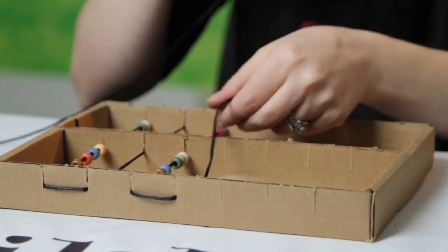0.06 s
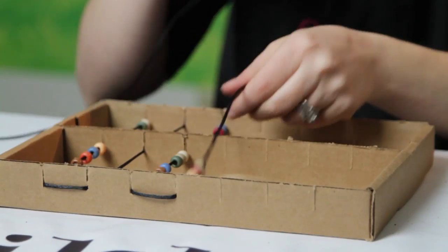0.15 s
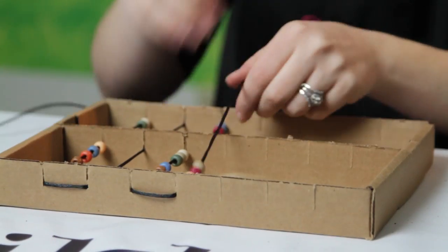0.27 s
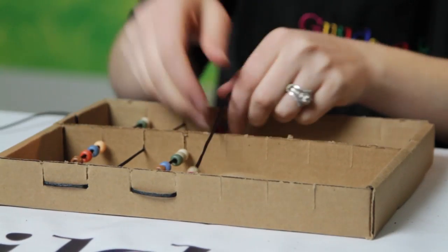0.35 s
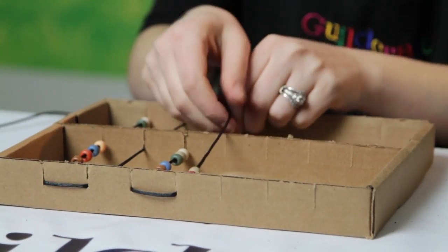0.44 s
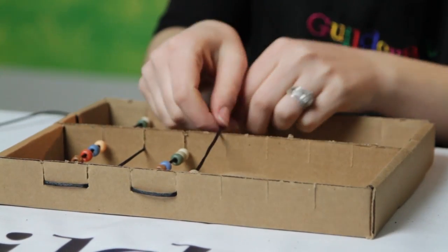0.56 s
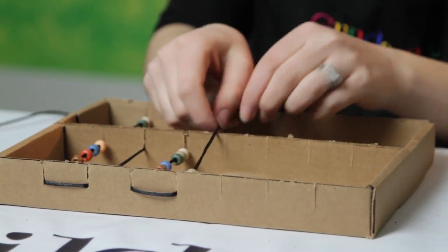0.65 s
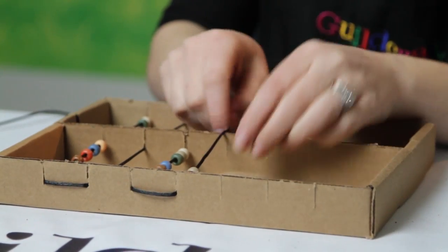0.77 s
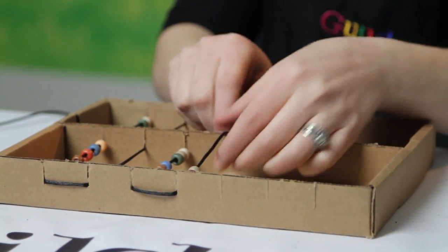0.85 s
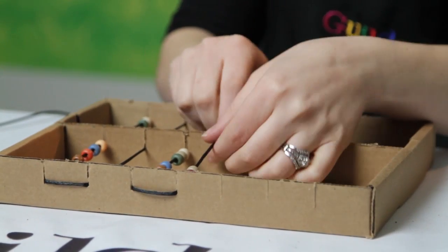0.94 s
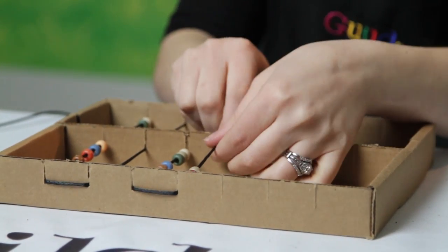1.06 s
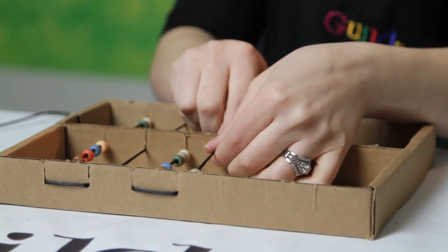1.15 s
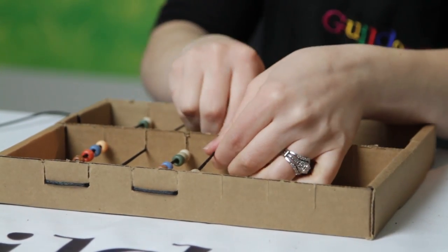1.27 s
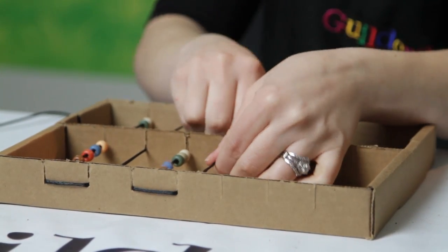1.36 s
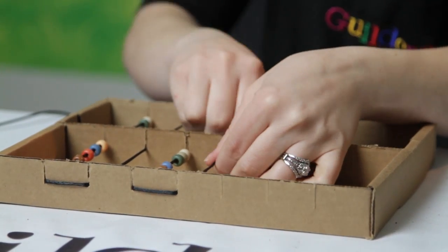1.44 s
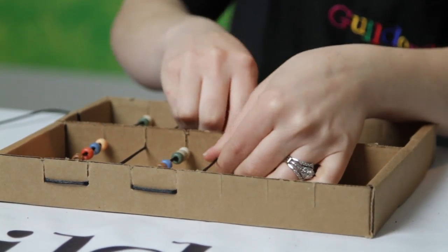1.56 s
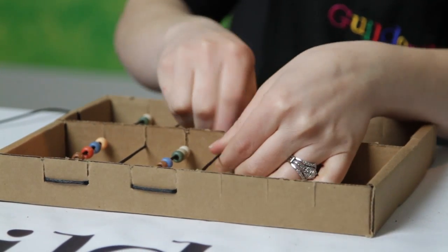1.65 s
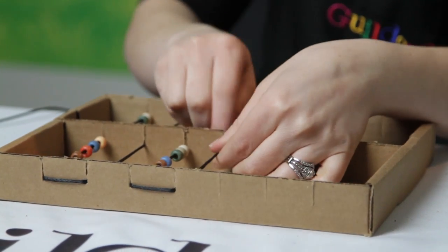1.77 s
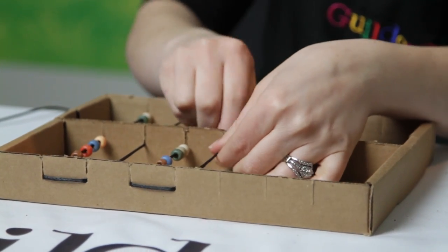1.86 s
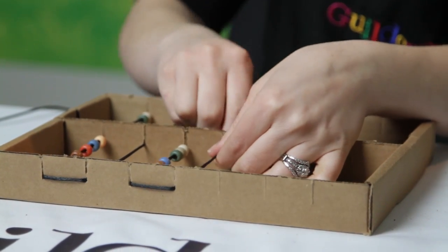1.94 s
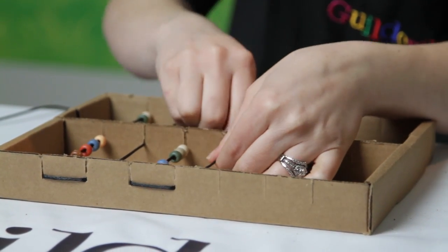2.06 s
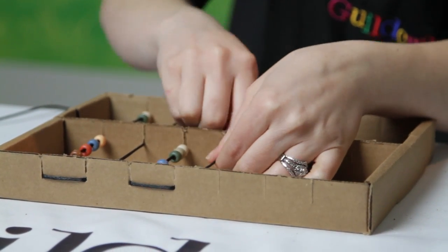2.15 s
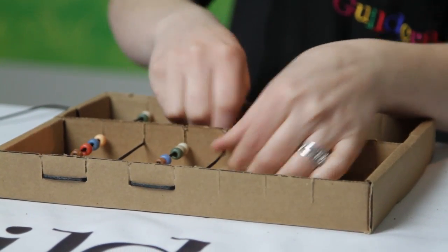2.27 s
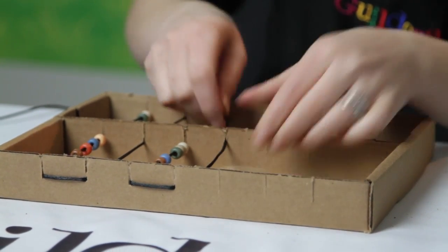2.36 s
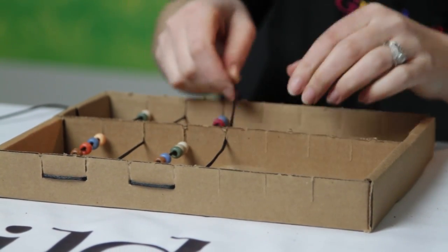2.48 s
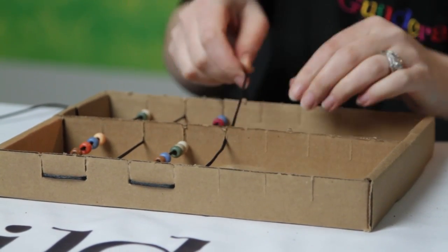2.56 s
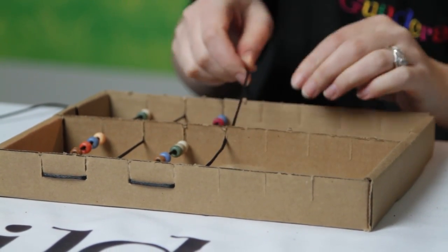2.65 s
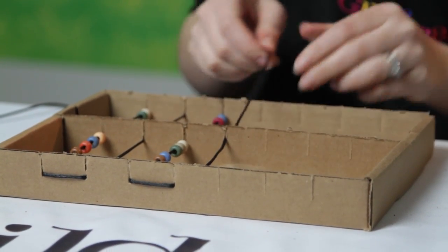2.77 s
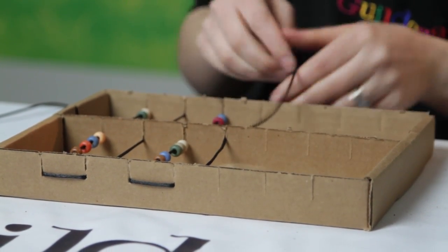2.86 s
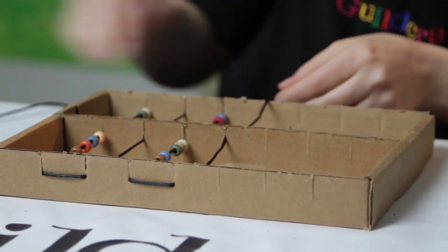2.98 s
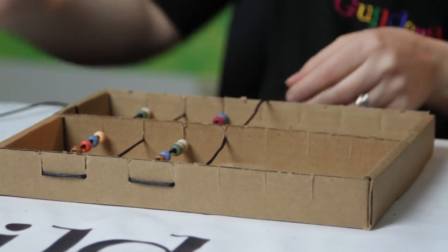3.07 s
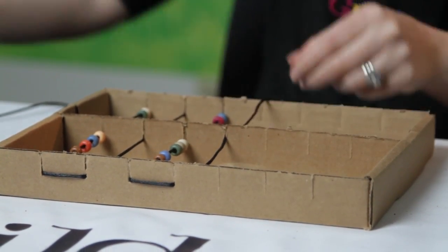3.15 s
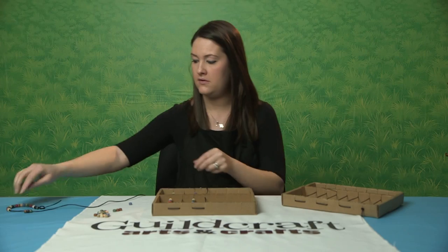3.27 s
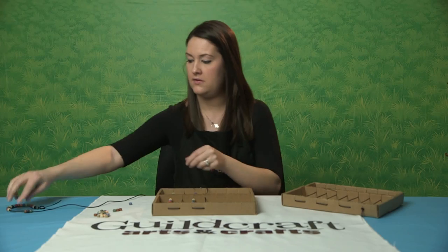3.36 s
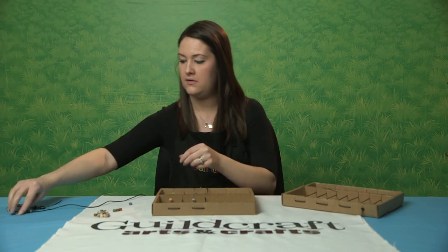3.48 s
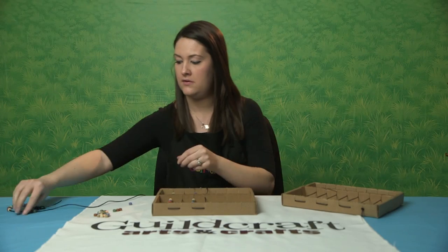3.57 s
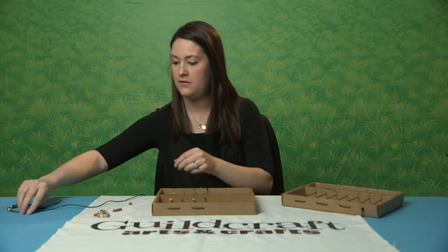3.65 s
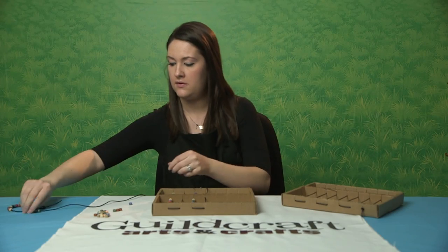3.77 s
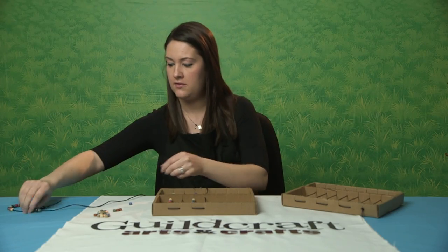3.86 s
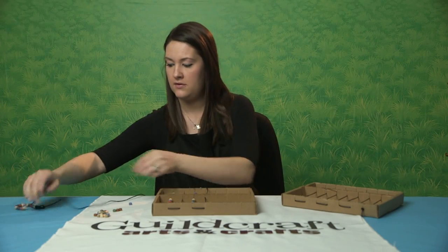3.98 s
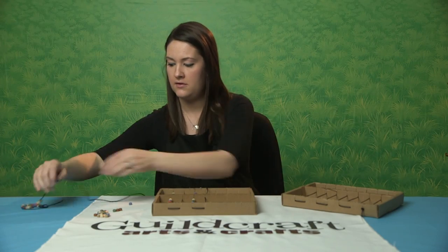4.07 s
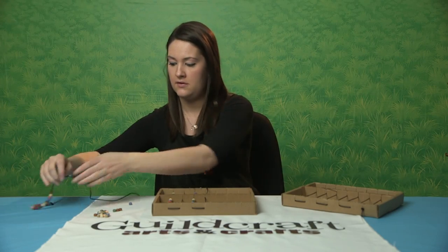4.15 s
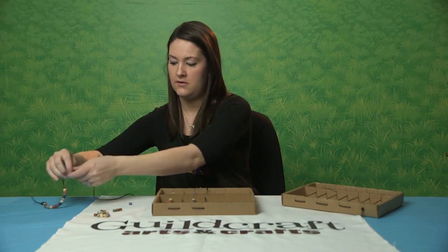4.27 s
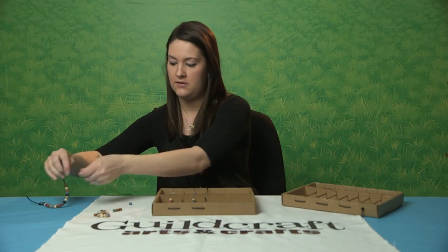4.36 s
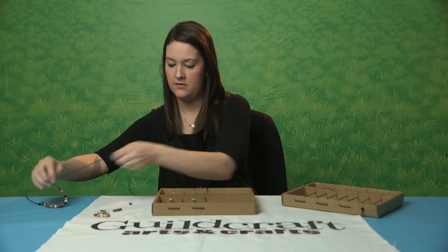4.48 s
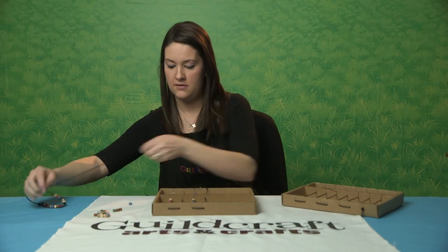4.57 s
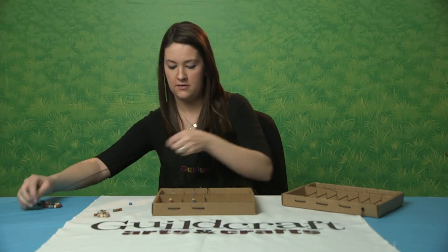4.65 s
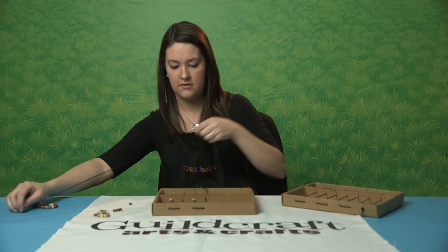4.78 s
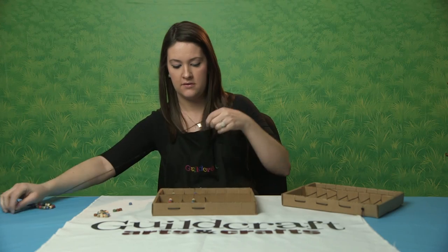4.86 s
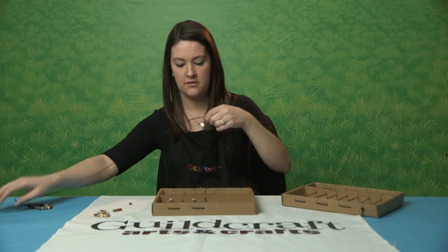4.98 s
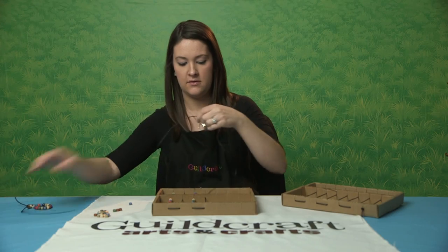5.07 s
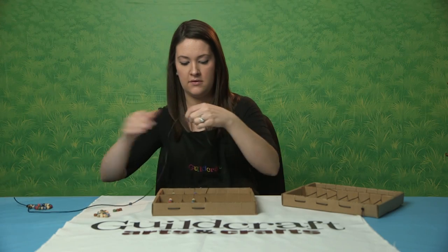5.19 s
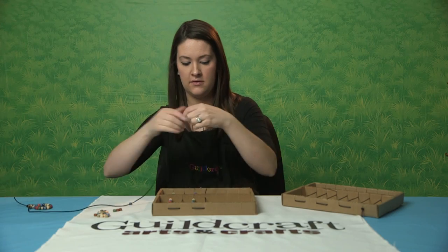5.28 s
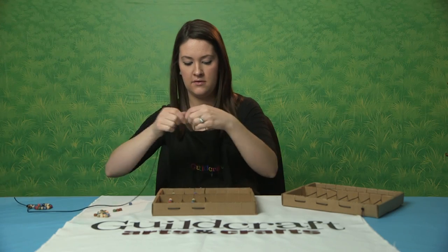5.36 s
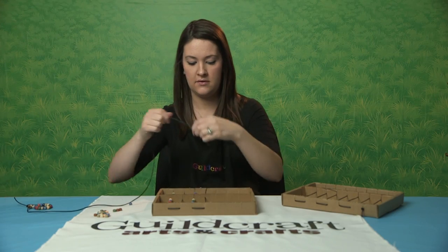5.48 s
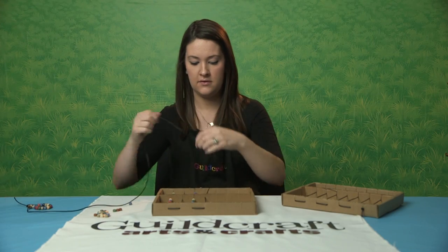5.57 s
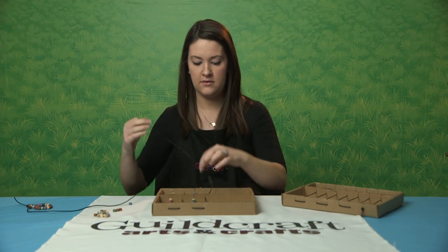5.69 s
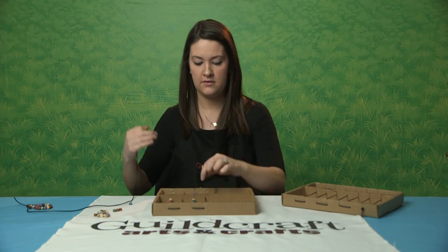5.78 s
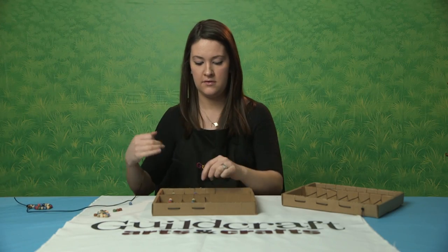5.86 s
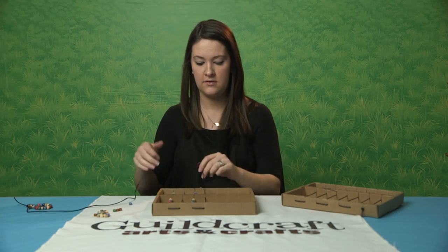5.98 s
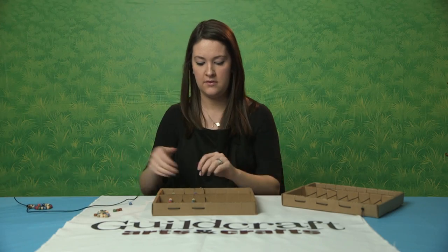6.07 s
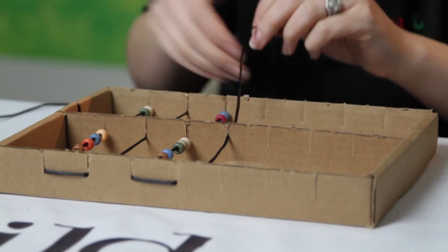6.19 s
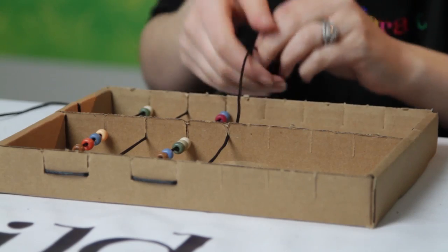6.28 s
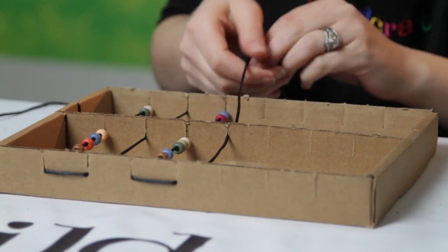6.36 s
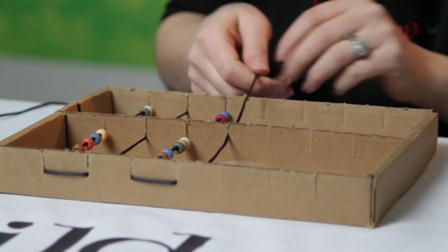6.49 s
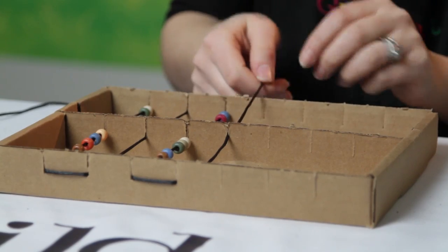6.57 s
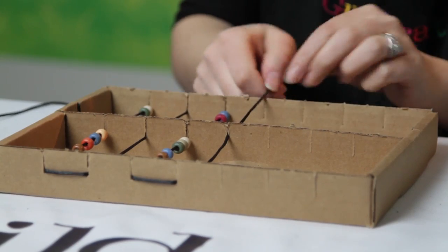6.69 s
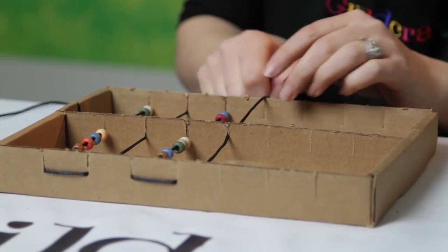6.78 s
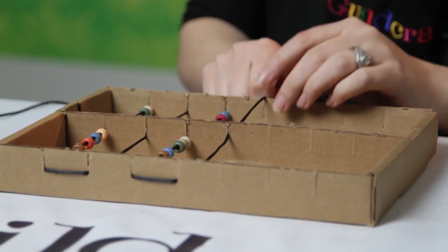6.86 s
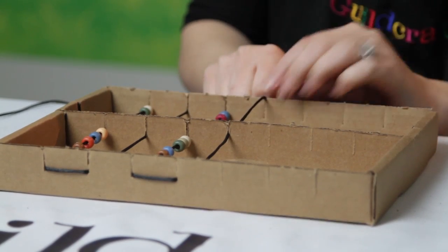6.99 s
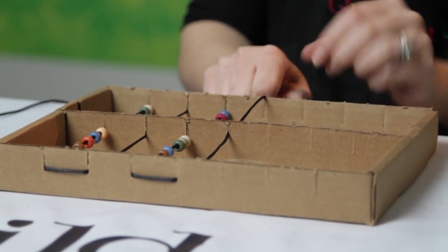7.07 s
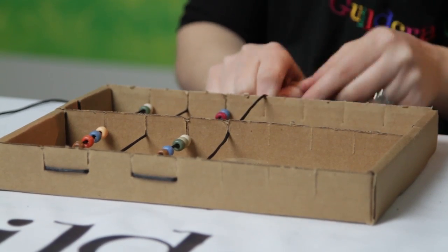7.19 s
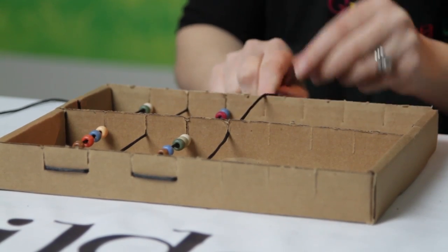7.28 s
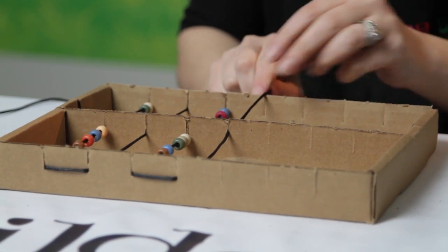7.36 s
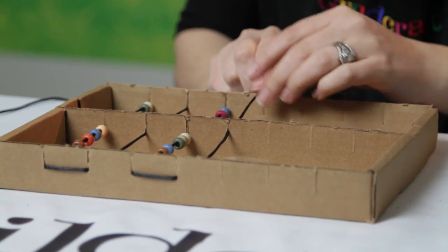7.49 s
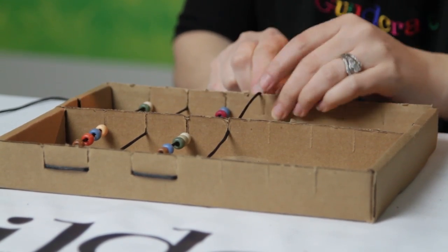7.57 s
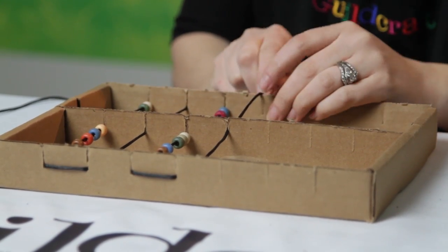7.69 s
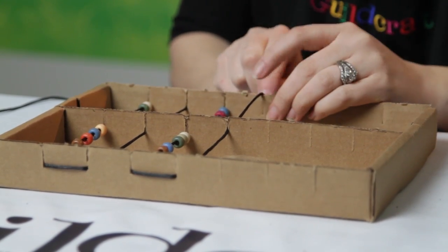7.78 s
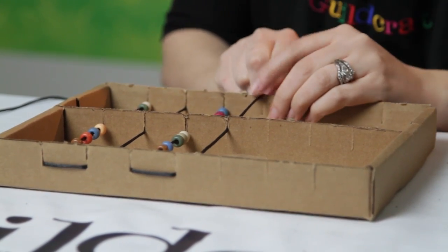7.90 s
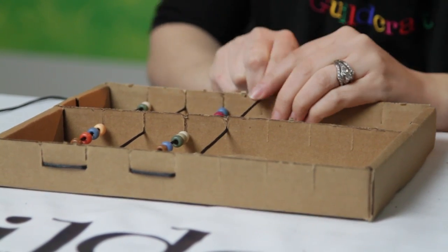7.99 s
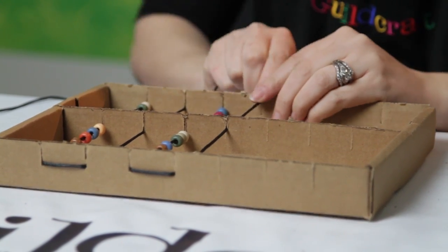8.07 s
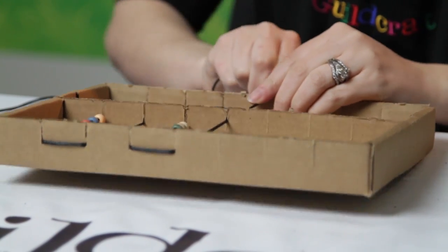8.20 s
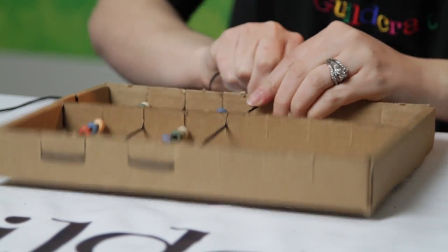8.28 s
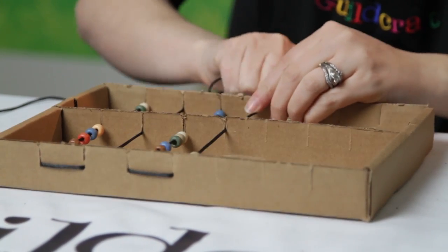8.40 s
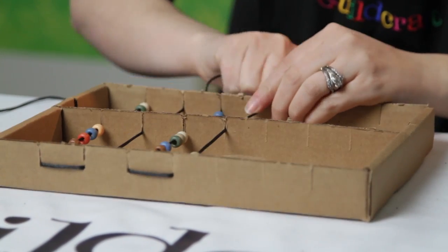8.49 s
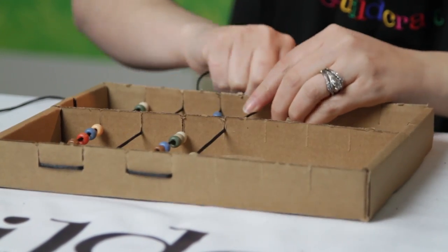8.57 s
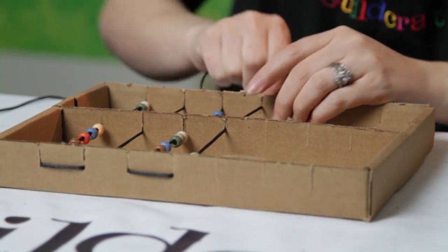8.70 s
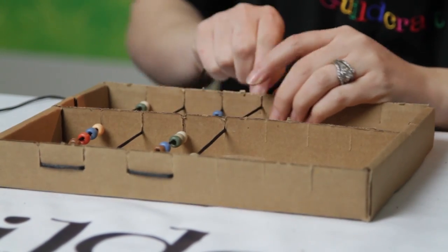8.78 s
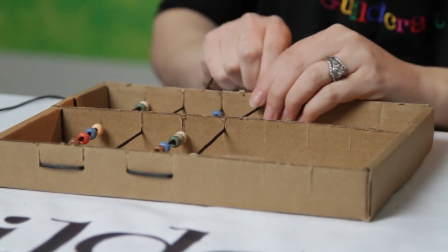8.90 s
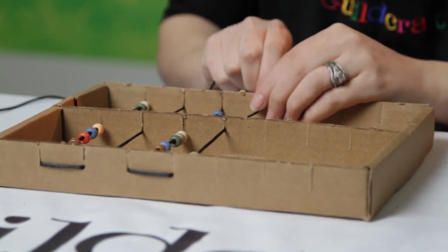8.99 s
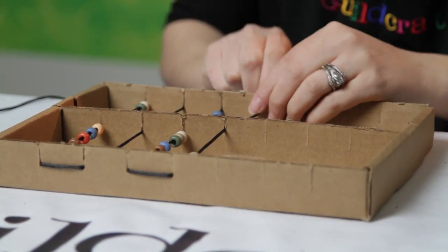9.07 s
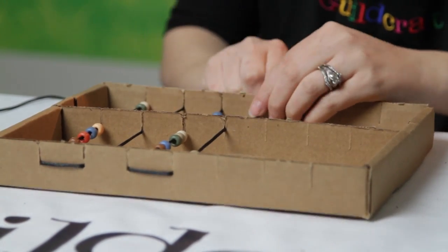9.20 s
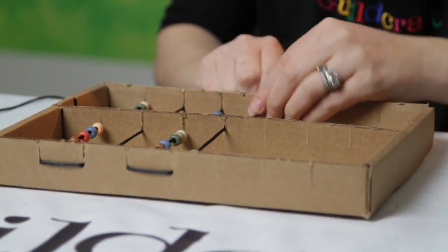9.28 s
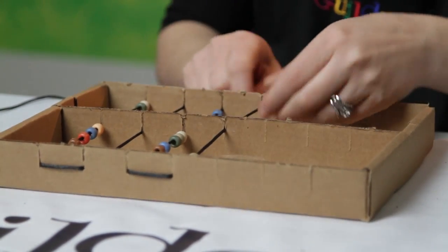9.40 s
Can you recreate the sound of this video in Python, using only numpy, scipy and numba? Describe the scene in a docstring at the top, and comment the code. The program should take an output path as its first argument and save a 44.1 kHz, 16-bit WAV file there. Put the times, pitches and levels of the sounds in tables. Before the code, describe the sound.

Close to the microphone, hands work a cord through a thin cardboard tray on a table. Dry scratching and light clicks lead to a loud hollow knock, then more scrapes, taps and tiny squeaks. A quieter middle has soft table touches and one sharp rap, then rustling returns with a second hard, clattering crack. Quiet small room, low ventilation rumble.

```python
"""Threading a beaded cord through a card tray

Hands thread a cord with beads through the slots of a cardboard tray on a cloth-covered table in a quiet room.
Skin and cord rub the board: random grains drive resonances of skin, card and table top, with short noisy puffs
and ticks, snags and soft slides on top. Taps on tray and table are bursts of noise with fading sine tones.
Delay lines add the room's echo; behind it lie ventilation rumble, a hum, a distant motor and microphone hiss.
"""
import sys
import numpy as np
from scipy import signal
from scipy.fft import rfft, irfft, next_fast_len
from scipy.io import wavfile
from scipy.ndimage import uniform_filter1d
from numba import njit

SR = 44100
rng = np.random.default_rng(int(sys.argv[2]) if len(sys.argv) > 2 else 0)


def transcribe(u):
    """Save the signal u as a 16-bit wav file named by the first command-line argument.

    u: samples, shape (n,) or (channels, n), limited to [-1, 1]; the rate is SR.
    q: integer samples, one column per channel.
    """
    v = np.clip(np.atleast_2d(u).T, -1, 1)
    q = np.round(v * 32767).astype(np.int16)
    wavfile.write(sys.argv[1], SR, q)


N = 416304

# Colour of the ventilation rumble. Each row: frequency in Hz, relative level in dB.
AIR_SPECTRUM = [(12, -36.5), (20, -2), (70, 3.5), (96, -17), (127, -9.5), (146, -15.5), (210, -18.5),
                (241, -17.5), (270, -36), (347, -28), (377, -38.5), (642, -46.5), (1060, -39.5),
                (3630, -41), (16000, -46.5)]
# Steady low hum. Each row: frequency in Hz, average level in dB.
HUM_TONES = [(118.4, -70)]
# A distant motor's changing tone. Each row: time in seconds, frequency in Hz, average level in dB.
MOTOR_DRONE = [(5.15, 72.4, -72), (5.35, 71.95, -60), (6.2, 72, -66.5), (6.32, 73.8, -62),
               (6.86, 73.2, -62), (7.04, 73.6, -56.5), (7.88, 72.75, -56.5), (8.05, 74.6, -59),
               (8.38, 73.8, -61)]
AIR_DB, HISS_DB = -62, -74
ROOM_T60_S, ROOM_DAMP, ROOM_DB = 0.39, 0.57, -24  # echo time to fall 60 dB, dulling per round (0 to 1), level
TOP_HZ = 15800  # highest frequency the recorder keeps

# The cord runs through a bead and the hole sings. Each row: start in seconds, length in seconds, level in dB.
SLIDES = [(5.5, 0.17, -73), (5.73, .16, -76)]
# The cord snags and twangs one short note. Each row: start in seconds, level in dB, frequency in Hz.
SNAGS = [(0.5085, -48, 2500), (0.5494, -48, 2720), (0.5744, -48, 3780), (0.6793, -46, 3120),
         (0.7344, -46, 3000), (0.9506, -46, 1720), (2.245, -41, 1410), (2.257, -34.5, 1220),
         (2.2644, -39, 1250), (2.2786, -35, 1240), (2.2874, -49, 2760), (2.2974, -42, 2900),
         (2.3264, -42, 2670), (2.3307, -35.5, 2440), (2.477, -41, 3160), (4.8377, -43.5, 3440),
         (4.8743, -39, 1170), (4.9423, -40, 1410), (7.032, -44, 3070)]
# Short noisy puffs and ticks: slips of skin or cord, and a palm landing at 3.527 seconds.
# Each row: start in seconds, peak level in dB, fade time in seconds, centre frequency in Hz,
# width as a share of the centre.
PUFFS = [(0.63, -40.5, 0.0074, 6900, 0.27), (0.641, -47, 0.0067, 2550, 0.45),
         (0.677, -45.5, 0.0072, 3130, 0.65), (0.717, -58, 0.01, 2960, 0.65),
         (0.7315, -49, 0.0091, 2970, 0.82), (0.767, -34, 0.008, 5000, 0.9), (0.832, -40, 0.01, 1310, 0.41),
         (0.958, -47, 0.012, 1740, 0.45), (1.133, -56, 0.0058, 3470, 0.65), (1.898, -32, 0.012, 7170, 0.72),
         (1.947, -49, 0.0088, 1730, 0.79), (2.2325, -36, 0.002, 1400, 1.1), (2.3265, -44, 0.01, 2420, 0.49),
         (2.449, -47, 0.018, 3130, 0.54), (2.473, -45.5, 0.01, 3140, 0.51), (2.538, -54, 0.003, 6100, 0.9),
         (2.749, -55, 0.003, 4940, 0.9), (3.527, -39.5, 0.03, 780, 0.88), (3.795, -55, 0.004, 10570, 0.5),
         (4.833, -42, 0.012, 3147, 0.59), (4.845, -35, 0.0035, 10800, 0.5),
         (4.872, -41.5, 0.005, 5200, 0.52), (4.888, -46, 0.0033, 6500, 0.8),
         (4.942, -44.5, 0.005, 2780, 0.49), (5.005, -50, 0.0075, 4000, 0.86),
         (5.037, -52.5, 0.005, 6000, 0.74), (5.088, -48.5, 0.0036, 7440, 0.97),
         (5.16, -53, 0.0089, 7150, 0.65), (5.981, -51, 0.0032, 10560, 0.5),
         (6.083, -62, 0.0046, 7030, 0.94), (6.553, -57, 0.0035, 7120, 0.73),
         (6.748, -53.5, 0.003, 6520, 0.33), (6.976, -39, 0.01, 6200, 0.74),
         (7.018, -42.5, 0.01, 6660, 0.65), (7.04, -50, 0.006, 3060, 1), (7.277, -44, 0.009, 4170, 0.76),
         (7.554, -65, 0.01, 2320, 0.62), (7.61, -52, 0.0033, 9440, 0.56), (7.6846, -34, 0.014, 1520, 0.38),
         (8.153, -43.5, 0.0066, 2150, 0.48), (8.182, -43, 0.0025, 9500, 0.5),
         (8.417, -18, 0.022, 6600, 0.85), (8.427, -22.5, 0.015, 2850, 0.92), (8.873, -42, 0.01, 3425, 0.5),
         (9.3701, -34.5, 0.0049, 2490, 0.95), (9.396, -51, 0.0029, 8000, 0.8)]

# Blows on the tray. Each row: start in seconds, tick level in dB, wall ring level in dB, thump level in dB,
# ring centre in Hz, tick centre in Hz, thump centre in Hz.
TRAY_TAPS = [(0.2858, -50, -40.5, -53.5, 715, 2980, 447), (0.508, -57, -50, -72, 2470, 3380, 129),
             (0.84, -43, -27, -70, 1370, 6850, 275), (1.3089, -52, -49, -51, 501, 6210, 255),
             (1.3575, -23, -19.5, -25, 2370, 3190, 304), (1.368, -7.5, -5.5, -20.5, 1170, 4650, 287),
             (1.6001, -39, -44, -51, 1060, 7320, 102), (1.833, -40.5, -50, -69, 1130, 5190, 133),
             (1.8994, -39, -39, -61, 1050, 7170, 256), (1.9537, -34.5, -35, -41, 1730, 6560, 285),
             (2.068, -28.5, -26.5, -50.5, 1380, 4400, 113), (2.144, -54, -50, -63, 1510, 3110, 113),
             (2.203, -50, -50, -49, 1350, 7540, 118), (2.2331, -36.5, -38, -47.5, 541, 7460, 336),
             (6.621, -69, -48, -70.5, 864, 3450, 116.4), (7.2673, -42, -30.5, -64, 515, 8840, 450),
             (7.3243, -41, -57, -69, 3215, 3320, 116), (7.6077, -49, -52, -73, 2465, 3180, 129.2),
             (7.6865, -33, -39, -55, 1820, 7060, 450), (7.7016, -37, -62, -72, 627, 6400, 127),
             (7.7947, -41, -53, -64, 1063, 3116, 102), (7.8046, -41, -36, -71, 1730, 6160, 102),
             (7.8189, -42, -52, -75, 1543, 3480, 102), (7.8368, -32.5, -36, -62, 1670, 2980, 363),
             (7.849, -37, -29.5, -72, 1760, 3370, 129), (7.855, -45, -44, -72, 1660, 3060, 363),
             (7.893, -43, -43, -73, 1584, 7500, 124), (8.0842, -61.5, -43, -61, 1810, 8090, 102),
             (8.4208, -25, -16.5, -57, 682, 6620, 458), (8.4314, -16, -18, -24.5, 513, 6740, 103.3),
             (8.4493, -31, -31, -28.5, 520, 3010, 143), (8.4983, -30.5, -30, -48, 724, 6250, 140),
             (8.6248, -24.5, -39, -39, 3910, 3920, 151), (8.9307, -40, -39.5, -58, 2766, 3130, 112),
             (9.3678, -41, -31.5, -57, 2510, 7050, 101), (9.414, -33, -36, -58, 3000, 2970, 288)]
# Blows on the table. Each row: the same as for the tray.
TABLE_TAPS = [(3.5296, -52, -41.5, -30.5, 558, 7210, 173.6), (3.842, -63.5, -37, -67, 825, 8000, 218),
              (4.127, -44.5, -59, -69, 606, 7720, 160), (4.4057, -43, -64, -65, 620, 6120, 101),
              (4.7158, -22.5, -16.5, -64, 1065, 3190, 450), (4.7444, -43, -25, -57, 1140, 3180, 350),
              (4.823, -44, -33, -61, 830, 3100, 304), (4.9694, -65, -42.5, -48, 520, 3950, 101),
              (5.448, -49.5, -81, -69.5, 525, 6470, 121.6), (5.7004, -48, -67, -72, 2205, 7520, 124.6),
              (5.91, -35.5, -25, -70, 1375, 3040, 409), (5.9383, -59, -37, -72, 1390, 3150, 100),
              (6.1705, -51, -32, -66, 1207, 3590, 102)]
# Ringing tones of the tray, the table, the bending table top and the whole table rocking on its legs.
# Each row: frequency in Hz, time to fall 60 dB in seconds, relative level in dB.
TRAY_MODES = [(523, 0.027, -4), (710, 0.024, -4.5), (940, 0.039, -13.5), (1194, 0.04, -3),
              (1360, 0.035, -2), (1766, 0.047, -6), (2030, 0.011, -11.5), (2401, 0.032, -1.5),
              (2940, 0.034, 0.5), (3470, 0.01, -5), (4434, 0.026, -5.5)]
TABLE_MODES = [(531, 0.8, -12), (631, 0.19, 2), (797, .14, -24), (832, 0.2, 2), (1001, 0.056, 8.5),
               (1084, 0.064, 1.5), (1380, 0.024, 10), (1570, 0.027, 11), (2060, 0.033, 20.5),
               (2210, .05, -15), (2750, 0.047, 21), (2865, 0.021, 34), (3203, 0.023, -23)]
TOP_MODES = [(147.4, 0.47, -1), (171, 0.15, -4), (221, .2, -6), (316, .13, -0.5), (359.4, 0.55, -0.5),
             (440, 0.097, -12.5)]
LEG_MODES = [(31.98, 0.22, -5), (56.4, .3, -2)]
THUMP_REACH = .17  # octaves of table-top modes that a thump reaches

# Resonances heard in rubbing: scratchy skin and cord, the coarse and fine parts of the scratch, the board,
# the shaking table top, the swaying table, and the bead's hole.
# Each row: centre in Hz, width setting in Hz, relative level in dB.
SCRATCH = [(4200, 1800, -8.5), (4730, 1000, 0), (5370, 310, -2), (6450, 1600, 1.5), (7430, 870, -0.6),
           (8280, 2100, 0)]
COARSE = [(2024, 640, 0.5), (2520, 570, -0.5), (2980, 550, -1), (3500, 1100, -2)]
FINE = [(9300, 1300, -2), (10950, 5300, 1), (14000, 830, -6), (15300, 6000, -7.5)]
BOARD = [(487.8, 180, 0), (670, 290, 1.5), (866, 220, -0.5), (1060, 160, 0.5), (1340, 530, -1.5),
         (1610, 270, -9.5)]
SHAKE = [(86, 100, -1.5), (149, 120, 1.5), (218, 100, -5), (293, 80, -0.5), (397, 90, -2)]
SWAY = [(62, 40, -2.5), (103, 93, 1), (149, 40, -1)]
HOLE = [(2063, 230, 0.3), (2940, 210, 1.4)]

# Strokes of skin or cord over card and cloth. Each row: firmest moment in seconds, swell time in seconds,
# fade time in seconds, scratch level in dB, coarse part in dB relative to the scratch, board level in dB,
# table-top level in dB.
STROKES = [(.212, 0.032, 0.19, -69.5, 5, -64.5, -64), (.522, .25, .05, -70.5, 5.5, -72, -62),
           (.574, 0.09, 0.055, -55.5, -2, -63, -73), (.598, 0.12, .025, -60.5, -1, -65, -75),
           (.632, .012, 0.083, -66, 3, -59, -62), (.682, 0.084, 0.011, -56, -4, -58.5, -58),
           (0.715, 0.0057, .07, -55.5, -10, -66.5, -61), (.745, 0.076, .03, -68, -7, -66, -65),
           (0.783, 0.023, 0.23, -43, -4.5, -49.5, -61), (.866, 0.15, 0.15, -52, 0.5, -64, -53.5),
           (.94, 0.25, 0.077, -52.5, -2.5, -63.5, -65), (1.005, 0.23, 0.051, -70, 4.1, -64, -64),
           (1.156, 0.057, 0.071, -48.5, -2, -50, -60), (1.2, .11, .15, -58, -1.2, -60, -62),
           (1.27, .3, 0.25, -59.5, -0.5, -65, -63), (1.309, 0.023, 0.023, -63, 10, -62, -45.5),
           (1.43, .11, 0.034, -56, -2.5, -52, -43.5), (1.588, 0.71, 0.17, -58.5, -5.5, -58, -63),
           (1.632, .21, 0.025, -63, -3.5, -65.5, -63), (1.84, 0.081, 0.09, -68, -3, -59, -70),
           (1.901, 0.038, 0.14, -50, -3, -51.5, -61), (1.952, 0.044, 0.032, -44.5, -4, -50.5, -40.5),
           (2.045, 0.23, 0.12, -65, 1, -58.5, -53.5), (2.232, 0.044, .11, -70, -5, -71, -54),
           (2.294, 0.085, 0.075, -48, -3.5, -51, -48.5), (2.366, 0.056, 0.044, -41, -5, -50.5, -50),
           (2.405, .11, 0.032, -63, 3, -66, -61), (2.465, 0.029, 0.044, -50.5, -3.5, -54, -62),
           (2.75, 0.15, 0.17, -80.5, 5, -71, -75), (2.856, 0.31, .11, -71.5, 0, -72, -73),
           (3.012, 0.048, 0.02, -70.5, 7, -71, -72), (3.612, 0.16, 0.045, -70.5, -7, -59, -54),
           (3.774, 0.18, 0.15, -73, -.5, -55.5, -68), (3.85, 0.051, 0.1, -67, -6, -50.5, -55),
           (3.94, .11, 0.075, -71, -21.5, -80, -68), (4.082, 0.26, 0.26, -71, -7, -59.5, -65),
           (4.265, 0.69, 0.13, -64, -4.5, -63.5, -68), (4.404, 0.0072, 0.021, -60.5, -17, -74, -64),
           (4.52, 0.16, 0.51, -63.5, -7.5, -83, -76), (4.66, 0.25, 0.087, -83, -9, -87, -88),
           (4.838, 0.023, 0.032, -47.5, -7, -55, -64.5), (4.954, 0.4, 0.15, -71, 5.5, -48.5, -50.5),
           (5.09, 0.25, 0.037, -70, -13.5, -72, -55.5), (5.218, .11, .11, -65.5, -27, -79, -60.5),
           (5.42, 0.067, 0.24, -72, -16, -83.5, -78), (5.57, 0.2, 0.43, -72.5, -2, -92, -79.5),
           (5.702, 0.066, .05, -64, -10, -85, -81), (5.76, 0.046, 0.09, -75, 5, -80, -72),
           (5.86, 0.19, 0.11, -96, 8, -64, -77), (6.11, 0.066, 0.36, -73.5, 3.5, -62, -65.5),
           (6.319, 0.23, 0.096, -68, -7, -80, -74), (6.42, 0.2, 0.22, -68, -3, -73, -74.5),
           (6.49, 0.18, 0.059, -71, -3, -81.5, -80), (6.78, 0.13, 0.16, -76, -2, -83.5, -76),
           (6.899, 0.12, 0.051, -62.5, -2, -69, -65), (6.985, 0.069, .045, -57, 1, -64, -67),
           (7.037, 0.036, 0.031, -51, 1, -62, -64), (7.143, 0.097, 0.28, -61.5, -3.5, -66.5, -74.5),
           (7.271, 0.013, 0.045, -55, -5, -59, -55), (7.31, .05, .21, -65, -6, -67, -67),
           (7.414, 0.041, 0.099, -62, 0, -67, -67), (7.469, 0.14, 0.025, -61.5, -0.5, -64, -64.5),
           (7.558, 0.0071, 0.28, -62, 0, -63.5, -67), (7.692, 0.049, 0.069, -51.5, -1, -52.5, -57.5),
           (7.804, 0.02, 0.13, -58.5, 1, -71, -74), (7.858, 0.075, 0.1, -58.5, 4, -54, -66),
           (7.99, 0.33, 0.35, -62, -0.5, -65, -67), (8.154, 0.057, 0.058, -55.5, -1.5, -65, -64),
           (8.22, 0.19, 0.15, -63.5, -11, -73, -78), (8.395, 0.22, 0.046, -56.5, 0, -68, -76),
           (8.6, 0.49, 0.077, -64, -6, -50, -52), (8.64, .03, 0.074, -58, 1.2, -65, -55),
           (8.75, 0.34, 0.089, -52, -0.7, -59.5, -56.5), (8.894, 0.26, 0.055, -54.5, -2, -62.5, -66),
           (9.037, 0.054, 0.26, -54, -2, -61, -68), (9.104, 0.17, .07, -53.5, 0.3, -64, -62),
           (9.18, 0.027, 0.33, -61, 0.3, -62.5, -64.5), (9.362, 0.058, 0.2, -57, -1.2, -60, -64),
           (9.427, .11, 0.053, -48.5, -2, -63, -58.5)]
# Hands, sleeves and cord resting and shifting between strokes. Each row: time in seconds, scratch level in dB,
# coarse part in dB relative to the scratch, board level in dB, table-top level in dB.
RESTING = [(0, -82, 14.5, -70.5, -67.5), (.38, -96, -17, -80, -72), (1.1, -67, -4, -82, -68),
           (2.15, -70, -1, -65, -67), (2.6, -76.5, 2, -71, -68), (3.1, -86, -0.5, -82.5, -74.5),
           (3.5, -84, 5, -80.5, -71), (3.7, -82, -2, -69, -59.5), (4.4, -77.5, -19, -81.5, -71),
           (4.7, -77, -5, -83, -77), (4.79, -67.5, -1, -63, -69), (5.3, -92.5, -0.5, -86, -72.5),
           (6.03, -90.5, 6.5, -93.5, -73.5), (6.65, -80, 0.5, -74.5, -71), (7.1, -73.5, -4.5, -74, -75),
           (7.53, -95, 0, -83, -72.5), (8.1, -77, 4, -74.5, -79), (9.44, -83, -4, -95, -70)]
# Loose beads and card judder on after a blow. Rows are scratch, coarse, board, table top, fine and sway.
# Each row: dB relative to the tick, dB relative to the ring, dB relative to the thump, time scale in seconds.
JUDDER = [(-19.5, -59.5, -45.5, .007), (-23.5, -39.5, -39.5, 0.01), (-59, -18, -9.5, 0.0085),
          (-59.5, -27, -5, .014), (-28, -59.5, -51, 0.0054), (-60, -44.5, -11.5, 0.034)]
JUDDER_FALL = 1.524  # level is 1 / (1 + t / time scale) ** JUDDER_FALL
SWELL_DB = 20  # a stroke gains this much in its swell time and loses it in its fade time
FINE_DB, FINE_PER_COARSE = -4.5, -.25  # dB relative to scratch; dB per dB: a coarser stroke has less fine part
SWAY_DB = -9.5  # relative to the table top, in strokes and at rest
UNEVEN_DB, BOARD_PATCHY_DB, TOP_PATCHY_DB = 2.0, 3.0, 2.5  # wander of finger pressure, board, table top
# A few fibres snap above the dense catches: share of samples, level, tail of sizes.
CRACKLE_SHARE, CRACKLE_DB, CRACKLE_SPREAD_DB = .002, 11, 1.5


def undb(db):
    """Turn decibels into a plain gain."""
    return 10 ** (np.asarray(db) / 20)


def unit(x):
    """Scale a sound to an rms level of 1."""
    return x / np.sqrt(np.mean(x ** 2))


def curve(table):
    """Draw straight lines between a table's rows, one value per sample for each column."""
    s, *columns = np.transpose(table)
    return np.array([np.interp(np.arange(N) / SR, s, c) for c in columns])


def band(x, hz, width_hz):
    """Two-pole band-pass, gain 1 at the centre."""
    return signal.lfilter(*signal.iirpeak(min(hz, SR / 2.2), hz / width_hz, fs=SR), x)


def twice_band(x, hz, width_hz):
    """The same band-pass twice over, for steeper sides."""
    return band(band(x, hz, width_hz), hz, width_hz)


def colour(x, spectrum):
    """Shape a sound's spectrum to points of frequency and level, at an rms level of 1."""
    hz, db = np.transpose(spectrum)
    size = next_fast_len(len(x))
    f = np.maximum(np.arange(size // 2 + 1) * SR / size, 1)
    gain = undb(np.interp(np.log(f), np.log(hz), db))
    return unit(irfft(rfft(x, size) * gain, size)[:len(x)])


def walk(rate):
    """A smooth random wander with about `rate` new targets a second and a spread near 1."""
    k = int(SR / rate)
    return uniform_filter1d(np.repeat(rng.standard_normal(N // k + 1), k), k)[:N]


def add(out, s, x):
    """Mix x into out from time s."""
    i = int(s * SR)
    out[i:i + len(x)] += x[:N - i]


def grit(share, spread_db):
    """Friction: a share of the samples catch, with a long tail of sizes."""
    return (rng.random(N) < share) * undb(spread_db * rng.exponential(size=N))


def rubbed(catches, peaks, rate, patchy_db):
    """Catches drive each resonance by chance amounts; each waxes and wanes alone as the contact moves."""
    total = 0
    for hz, width, db in peaks:
        drive = catches * rng.standard_normal(N)
        level = undb(db + patchy_db * walk(rate))
        total = total + level * twice_band(drive, hz, 1.1 * width)
    return unit(total)


def room_tone():
    """Shaped noise is the ventilation, wavering sines are hum and motor, plain noise is the microphone's hiss."""
    t = np.arange(N) / SR
    air = undb(AIR_DB + 0.31 * walk(7.4)) * colour(rng.standard_normal(N), AIR_SPECTRUM)
    hum = sum(np.sqrt(2) * undb(db + 1.5 * walk(2.0)) * np.sin(2 * np.pi * hz * t) for hz, db in HUM_TONES)
    hz, db = curve(MOTOR_DRONE)
    fade_in = np.clip((t - MOTOR_DRONE[0][0]) / 0.37 + 1, 0, 1)
    fade_out = np.clip((MOTOR_DRONE[-1][0] - t) / 1.9 + 1, 0, 1)
    tone = np.sin(2 * np.pi * np.cumsum(hz) / SR)
    drone = np.sqrt(2) * undb(db + .4 * walk(3.6)) * tone * fade_in * fade_out
    hiss = undb(HISS_DB) * rng.standard_normal(N)
    return air + hum + drone + hiss


@njit
def walls(x, lags, gain, damp):
    """Room echo: eight delay lines that feed each other, duller on every round."""
    line, soft, out = np.zeros((8, 4096)), np.zeros(8), np.zeros(len(x))
    for i in range(len(x)):
        total = 0.
        for k in range(8):
            soft[k] += (1 - damp) * (gain[k] * line[k, (i - lags[k]) & 4095] - soft[k])
            total += soft[k]
        out[i] = total
        for k in range(8):
            line[k, i & 4095] = x[i] + soft[k] - total / 4
    return out


def slides():
    """Cord fibres brush the bead's hole, fading in and out softly."""
    t = np.arange(N) / SR
    gate = np.zeros(N)
    for s, length, db in SLIDES:
        gate += undb(db) * np.clip(np.minimum(t - s, s + length - t) / 0.022 + 1, 0, 1)
    return gate * rubbed(grit(0.4, spread_db=0.5), HOLE, rate=14, patchy_db=1.0)


def snags():
    """Each snag is a short, slightly unsteady tone that swells and fades within some milliseconds."""
    out, t = np.zeros(N), np.arange(int(.04 * SR)) / SR
    swell = t / 0.0032 * np.exp(1 - t / 0.0018)
    for s, db, hz in SNAGS:
        wobble = .5 * rng.standard_normal(len(t)).cumsum() / 8
        add(out, s, undb(db) * swell * np.sin(2 * np.pi * hz * t + wobble))
    return out


def puffs():
    """Each puff or tick is a quick, grainy burst of noise in one band that dies away."""
    out, t = np.zeros(N), np.arange(int(.12 * SR)) / SR
    for s, db, fade, hz, width in PUFFS:
        grains = rng.standard_normal(len(t)) * rng.exponential(size=len(t))
        puff = grains * (1 - np.exp(-t / 0.0021)) * np.exp(-(t / fade) ** 2)
        puff = band(band(puff, hz, width * hz), hz, 2 * hz)
        add(out, s, undb(db) * puff / np.max(np.abs(puff)))
    return out


def nearness(modes, hz, reach):
    """Modes within reach octaves of hz take the blow; each spot favours some over others."""
    octaves = np.log2(np.array(modes)[:, :1] / hz)
    return undb(1.0 * rng.standard_normal(octaves.shape)) / (1 + np.abs(octaves / reach) ** 2.6)


def ring(modes, t, gains):
    """A struck body's tones, each dying away at its own pace, scaled to peak 1."""
    hz, t60, db = np.transpose(modes)[:, :, None]
    y = np.sum(gains * undb(db - 60 * t / t60) * np.sin(2 * np.pi * hz * t), axis=0)
    return y / np.max(np.abs(y))


def taps(table, modes, reach, tick_s, knock_s, rock_db):
    """A tick of contact, a dull knock and the ring of the struck wall, and the thump of the table."""
    out, t = np.zeros(N), np.arange(int(.6 * SR)) / SR
    push = 1 - np.exp(-t / 0.0061)  # the heavy top gets under way slowly
    rock = (1 - np.exp(-t / 0.015)) * ring(LEG_MODES, t, 1)
    for s, tick_db, ring_db, thump_db, hz, tick_hz, thump_hz in table:
        touch = rng.standard_normal(len(t)) * t * np.exp(-t / tick_s)
        tick = twice_band(touch, tick_hz, 1.1 * tick_hz) + undb(-13) * band(touch, 10000, 9000)
        # The knock stands for the many modes too dense to tell apart.
        knock = band(rng.standard_normal(len(t)) * np.exp(-t / knock_s), hz, 1.2 * hz)
        body = ring(modes, t, nearness(modes, hz, reach)) + 0.079 * knock / np.max(np.abs(knock))
        body = (1 - np.exp(-t / 0.0012)) * body
        thump = push * ring(TOP_MODES, t, nearness(TOP_MODES, thump_hz, reach=THUMP_REACH))
        thump = thump + undb(rock_db) * rock
        tick = tick / np.max(np.abs(tick))
        add(out, s, undb(tick_db) * tick + undb(ring_db) * body + undb(thump_db) * thump)
    return out


def layer_powers(scratch_db, coarse_db, board_db, top_db):
    """Power of scratch, coarse part, board, table top, fine part and sway, in that order."""
    fine_db = scratch_db + FINE_DB + FINE_PER_COARSE * coarse_db
    return undb([scratch_db, scratch_db + coarse_db, board_db, top_db, fine_db, top_db + SWAY_DB]) ** 2


def contact():
    """Gains of the six rubbing layers: resting hands, strokes and judder add up in power."""
    power = layer_powers(*curve(RESTING)).T.copy()
    for s, swell, fade, *db in STROKES:
        t = np.arange(-int(2 * swell * SR), int(2 * fade * SR)) / SR
        shape = undb(-SWELL_DB * np.where(t < 0, -t / swell, t / fade)) ** 2
        add(power, s + t[0], np.outer(shape, layer_powers(*db)))
    *share_db, scale = np.transpose(JUDDER)
    judder = (1 + np.arange(int(.4 * SR))[:, None] / SR / scale) ** (-2 * JUDDER_FALL)
    for s, *db, _, _, _ in TRAY_TAPS + TABLE_TAPS:
        add(power, s + 0.004, judder * (undb(db) ** 2 @ undb(share_db) ** 2))
    return np.sqrt(uniform_filter1d(power.T, size=128))


def rubbing():
    """Dense catches are heard as scratch and through the board, over a noisy table shake; pressure is uneven."""
    scratch_gain, coarse_gain, board_gain, top_gain, fine_gain, sway_gain = contact()
    pressure_db = UNEVEN_DB * walk(45)
    crackle = undb(CRACKLE_DB) * grit(CRACKLE_SHARE, spread_db=CRACKLE_SPREAD_DB)
    catches = grit(.25, spread_db=1.5) + crackle
    catches = catches * undb(pressure_db + 1.1 * walk(140))
    board_catches = grit(.08, spread_db=1.25) * undb(pressure_db)
    out = scratch_gain * rubbed(catches, SCRATCH, rate=14, patchy_db=3.5)
    out += fine_gain * rubbed(catches, FINE, rate=15, patchy_db=1.5)
    out += coarse_gain * rubbed(catches, COARSE, rate=25, patchy_db=1)
    out += board_gain * rubbed(board_catches, BOARD, rate=12, patchy_db=BOARD_PATCHY_DB)
    # With 1 in place of catches, plain noise drives the table.
    out += top_gain * rubbed(1, SHAKE, rate=5.4, patchy_db=TOP_PATCHY_DB)
    out += sway_gain * rubbed(1, SWAY, rate=4.9, patchy_db=1.5)
    return out


def scene():
    """Add up all the sounds of the hands, let the room echo them, and lay the quiet room behind."""
    tray = taps(TRAY_TAPS, TRAY_MODES, reach=0.43, tick_s=.0007, knock_s=0.0044, rock_db=1.5)
    table = taps(TABLE_TAPS, TABLE_MODES, reach=0.42, tick_s=0.0006, knock_s=0.014, rock_db=-9)
    hands = slides() + snags() + puffs() + tray + table + rubbing()
    lags = np.array([563, 701, 887, 1069, 1303, 1571, 1873, 2203])  # delays in samples
    # The tiny offset keeps the delay lines from slowing down on near-zero numbers.
    echo = walls(hands + 1e-18, lags, undb(-60 * lags / SR / ROOM_T60_S), ROOM_DAMP)
    return (room_tone() + hands + undb(ROOM_DB) * echo)[None]


def record(dry):
    """The recorder cuts the top with a steep low-pass filter."""
    low_pass = signal.ellip(10, .2, 70, TOP_HZ, fs=SR, output="sos")
    return signal.sosfilt(low_pass, dry)


dry = scene()
out = record(dry)
transcribe(out)
```